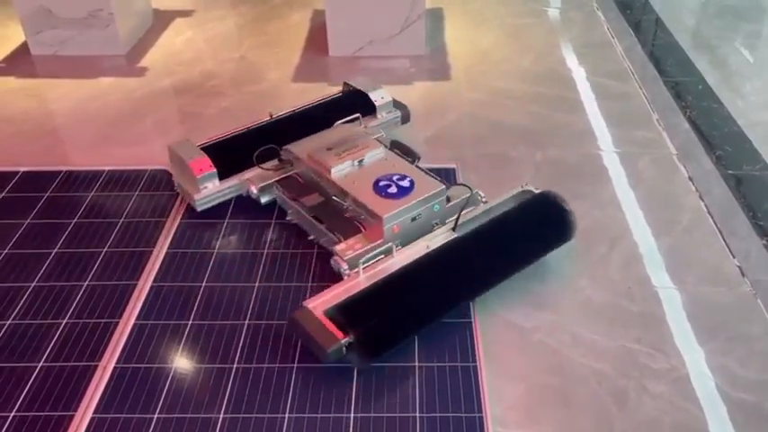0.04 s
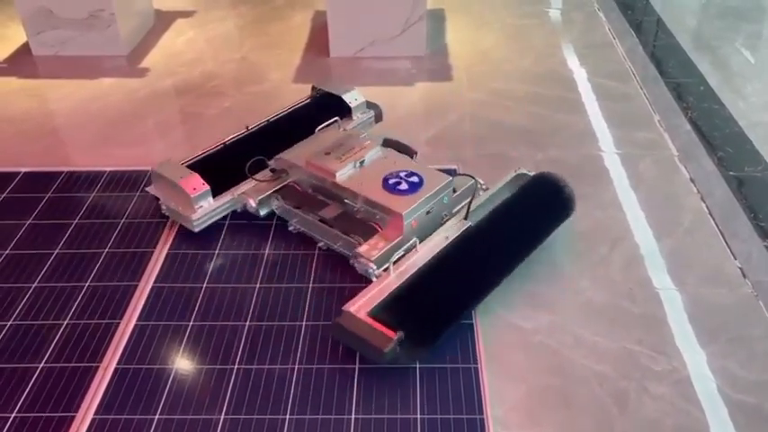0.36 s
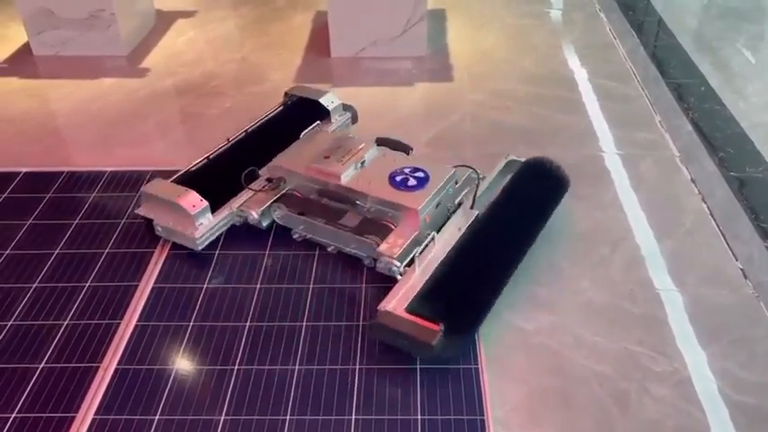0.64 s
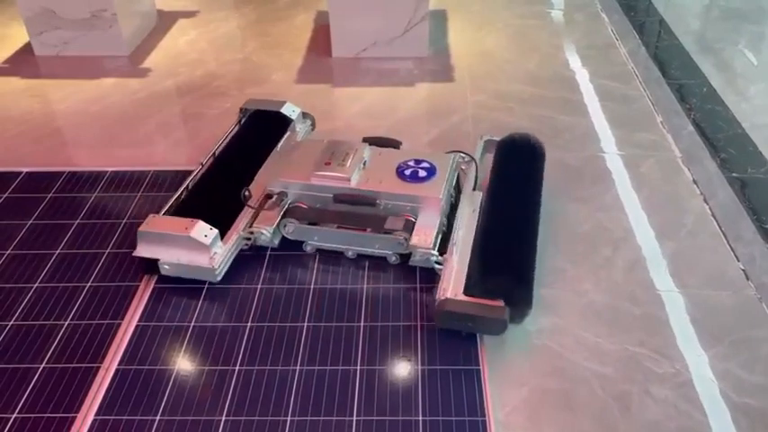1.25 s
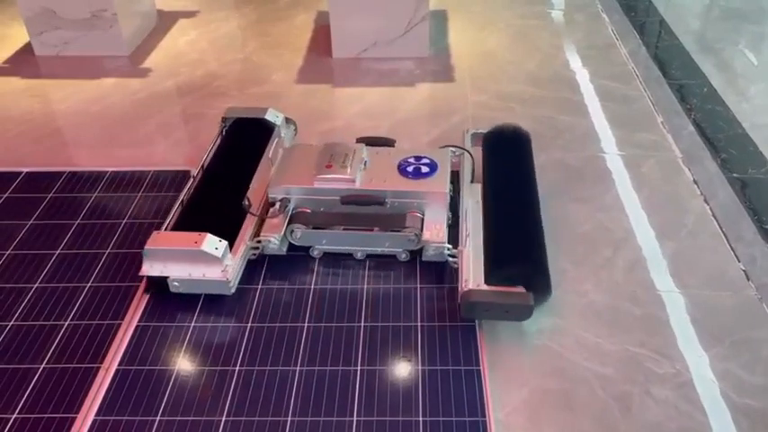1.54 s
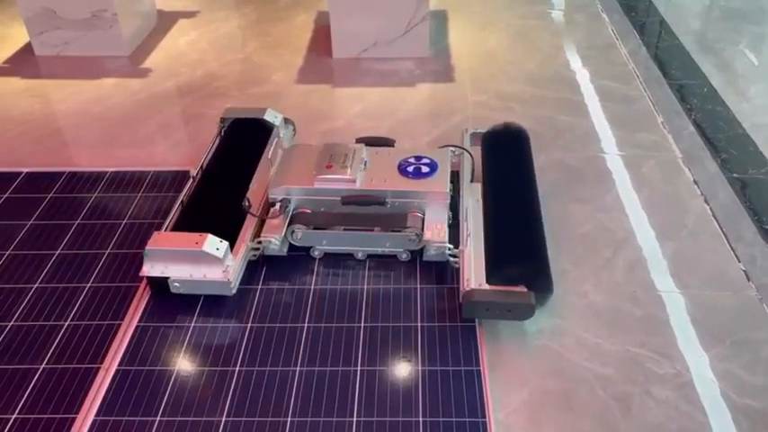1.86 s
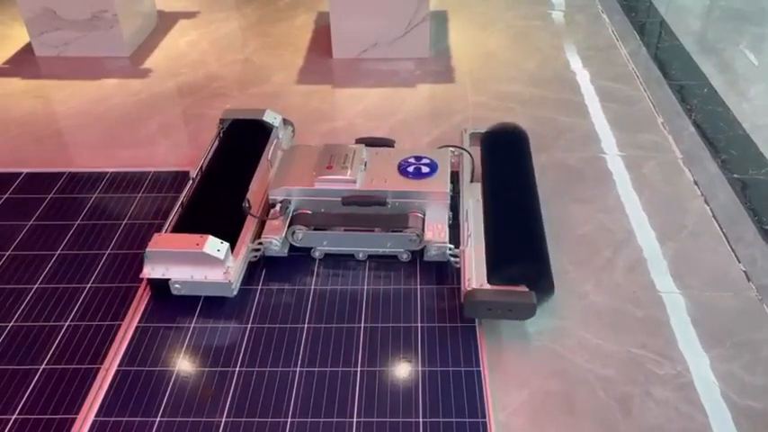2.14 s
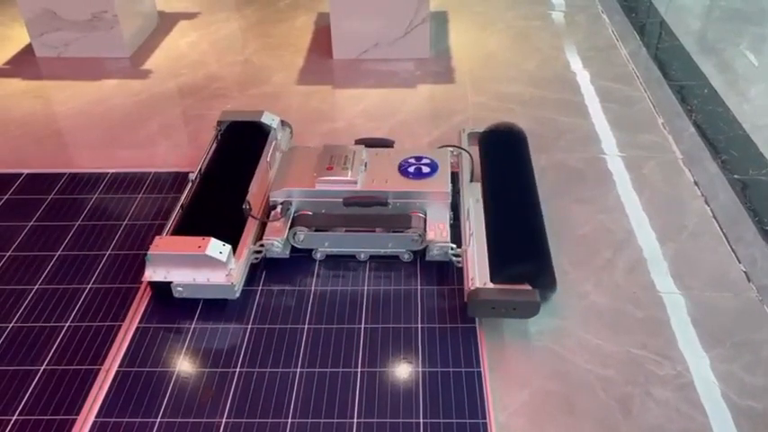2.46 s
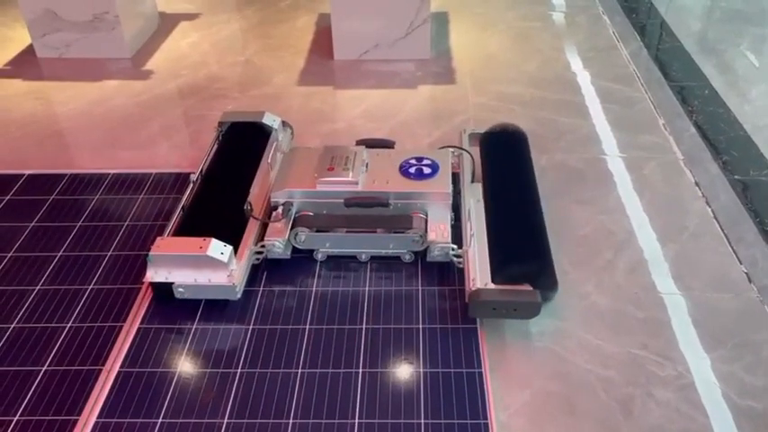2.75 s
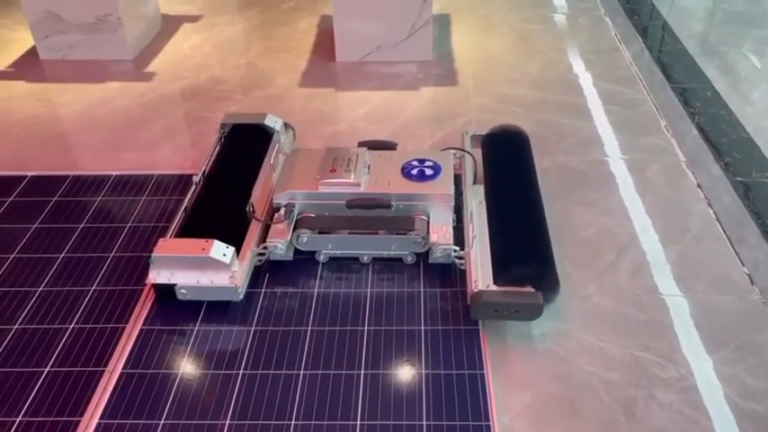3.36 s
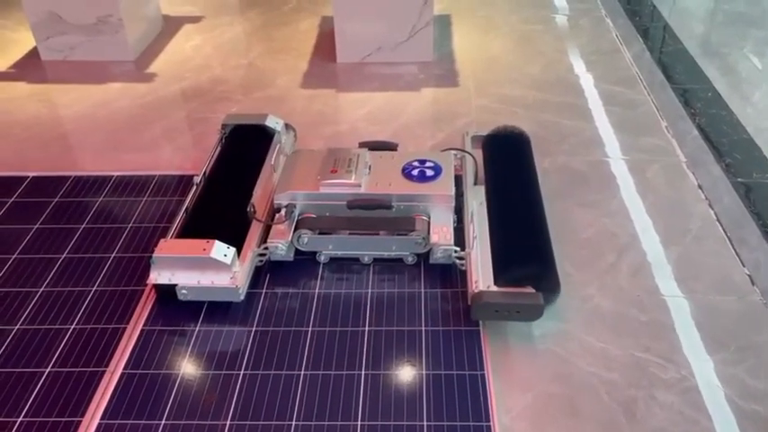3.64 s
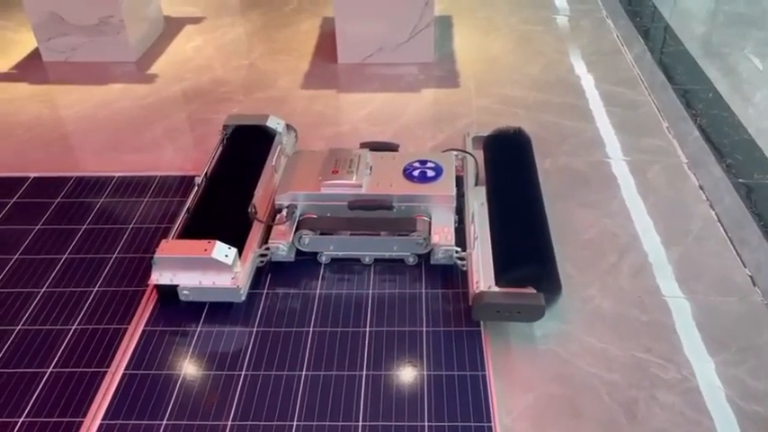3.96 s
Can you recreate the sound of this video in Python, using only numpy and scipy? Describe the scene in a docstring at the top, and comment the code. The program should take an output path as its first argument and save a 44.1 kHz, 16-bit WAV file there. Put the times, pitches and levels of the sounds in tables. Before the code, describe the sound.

A cleaning robot's rotating brushes hiss close by in a hard-floored hall, squeaking and rasping over a motor hum as it turns. The hiss steadies, a gear whine wavers, and a dull, booming thump comes near the end.

```python
"""A hard-floored hall, one microphone near a tracked cleaning robot on a glass panel.
First the robot turns: two roller brushes hiss through their housings and squeak as they are dragged
sideways, over the hum of the track drive. The turn ends in a rasp; the robot straightens up, the hiss
settles to a steady sweep, the drive comes to rest and a gear whine wavers as the load eases.
Near the end comes a dull, booming thump. The recorder's noise suppressor makes the hiss swirl."""
import sys
import numpy as np
from scipy import signal
from scipy.fft import rfft, irfft
from scipy.io import wavfile
from scipy.ndimage import uniform_filter1d, minimum_filter1d

SR = 44100
rng = np.random.default_rng(int(sys.argv[2]) if len(sys.argv) > 2 else 0)


def transcribe(signal):
    """Save signal, clipped to [-1, 1], as a 16-bit WAV file at the path in sys.argv[1]."""
    frames = np.atleast_2d(signal).T
    limited = np.clip(frames, -1, 1)
    pcm = np.round(limited * 32767).astype(np.int16)
    wavfile.write(sys.argv[1], SR, pcm)


N = 176400
TIME = np.arange(N) / SR
FREQS = np.maximum(np.arange(N // 2 + 1) * SR / N, 1)

# bristles scrubbing in the turn: time_s, level_db
SCRUB_LEVELS = [(0, -27.5), (.2, -28), (.5, -27.5), (.85, -29.5), (1.2, -35), (1.45, -41), (1.7, -50),
                (4, -52)]
# colour of the scrub: frequency_hz, relative_db
SCRUB_SPECTRUM = [(100, -36), (250, -13), (430, 0.5), (590, -7), (760, 1), (980, -2.5), (1200, 2.5),
                  (1800, 1), (2900, -2.5), (4000, 0), (4550, 0.5), (5400, 2), (6100, -4.5), (6800, -11.5),
                  (7300, -31), (8600, -21), (10500, -17), (12000, -20.5), (13600, -32)]
# panel and housing resonances (+) and dips (-) in the scrub: centre_hz, width_hz, gain_db
SCRUB_RESONANCES = [(1160, 54, 1.5), (1435, 70, 3.5), (1540, 53, -2), (1670, 79, 3), (2090, 90, 4.5),
                    (2260, 120, -4), (2428, 92, 7.5), (2870, 37, 3), (3235, 79, 7.5), (3500, 60, -1),
                    (3630, 68, 4), (4120, 280, 7.5), (4450, 150, -1.5), (5100, 110, 4.5)]
# steady sweep of the rollers: time_s, level_db
SWEEP_LEVELS = [(0, -35.5), (.6, -38), (1.1, -33), (1.4, -31.5), (1.65, -32), (2.05, -31), (2.35, -31.5),
                (2.9, -31.5), (3.3, -31.5), (3.7, -31), (4, -31.5)]
# colour of the sweep: frequency_hz, relative_db
SWEEP_SPECTRUM = [(100, -8), (400, -9.5), (600, -6), (800, -7), (980, -6.5), (1200, -3), (1450, 0),
                  (1900, -1), (3000, 1.5), (3900, 3), (4550, -0.5), (5200, -0.5), (6000, -6), (6800, -12.5),
                  (7300, -17.5), (8600, -20), (10500, -19.5), (12000, -25), (13600, -35)]
# panel and housing resonances and dips in the sweep: centre_hz, width_hz, gain_db
SWEEP_RESONANCES = [(843, 136, 5.5), (943, 89, -3), (1015, 18, 9), (1168, 111, 8), (1281, 120, 5),
                    (1506, 55, -6), (1593, 40, 3), (2117, 38.2, 4), (2200, 106, -4.5), (2558, 106, 4.5),
                    (3100, 110, -3), (3596, 47, 5), (5090, 220, 2.5)]
# rasp of the rollers as the turn ends: time_s, level_db
RASP_LEVELS = [(.6, -61), (.85, -44.5), (1.05, -39.5), (1.35, -41), (1.5, -46), (1.65, -65)]
# colour of the rasp: frequency_hz, relative_db
RASP_SPECTRUM = [(500, -38), (660, 6.5), (760, -17), (850, 6.5), (960, -25), (1300, -9), (1520, -24),
                 (1750, -4), (1960, 8.5), (2080, 0), (2220, -7), (2400, -33), (2560, 2), (2700, 0),
                 (3000, -27), (6000, -41)]
# brief bristle scrapes: centre_s, half_length_s, level_db
SCRAPE_SWELLS = [(0.228, 0.034, -31.5), (.85, .03, -42)]
# colour of the scrapes: frequency_hz, relative_db
SCRAPE_SPECTRUM = [(1000, -30), (2800, -14), (3400, -3), (3900, 6), (4300, -19), (4500, -20), (7000, -44)]
# roller squeaks: centre_s, half_length_s, pitch_hz, level_db
SQUEAKS = [(.17, .025, 4170, -32.5), (.295, .02, 4230, -33), (.46, .03, 4200, -33), (.525, .015, 4170, -33),
           (.675, .015, 4210, -31), (.85, .03, 4180, -35.5), (1.09, 0.018, 2560, -31.5),
           (1.225, 0.014, 2540, -30.5), (1.29, 0.01, 2590, -34), (1.39, .025, 2550, -37)]
# track drive: time_s, rotation_hz, level_db
DRIVE_MOTION = [(0, 49.03, -39.5), (.29, 49.87, -38), (.9, 49.83, -38), (1.48, 49.9, -37.5),
                (1.56, 50.2, -45.5), (1.62, 50.6, -45), (1.7, 50.6, -41), (1.83, 50.4, -42.5),
                (2.12, 49.8, -38), (2.26, 49.55, -39), (2.4, 49.3, -45.5), (2.62, 48.9, -62.5)]
# partials of the drive: multiple, relative_db
DRIVE_PARTIALS = [(3, -15), (4, -22), (5, -14.5), (6, 0), (7, -5.5), (8, -27), (9, -17)]
# thin whistle of the motor controller: time_s, level_db
WHISTLE_LEVELS = [(0, -62.5), (.68, -63.5), (.77, -69), (1.07, -61), (1.2, -69), (1.28, -60.5),
                  (1.43, -59.5), (1.48, -75), (1.85, -71), (2.06, -63), (2.35, -76)]
# gear whine, higher in the turn: time_s, pitch_hz, level_db
WHINE_CURVE = [(0, 1418, -54), (.16, 1425, -36.5), (.55, 1426, -51.5), (.75, 1422, -41), (1.02, 1390, -48),
               (1.4, 1310, -70), (1.58, 1247, -51), (1.84, 1245, -44), (1.93, 1253, -45),
               (2.14, 1259, -39.5), (2.28, 1284, -43), (2.38, 1238, -51), (2.48, 1284, -46),
               (2.6, 1272, -45), (2.76, 1260, -50), (2.9, 1268, -44), (3.02, 1220, -48),
               (3.12, 1243, -42.5), (3.3, 1258, -56), (3.43, 1303, -40), (3.64, 1242, -41),
               (3.75, 1299, -43), (3.86, 1240, -36.5), (4, 1269, -40.5)]
# brief surges of the whine: centre_s, half_length_s, level_db
WHINE_SURGES = [(1.59, 0.022, -38.5), (1.835, 0.02, -40), (2.668, .012, -39), (2.738, 0.02, -35.5),
                (2.81, 0.018, -35.5)]
# a soft nudge, then the blow: start_s, level_db
BLOWS = [(3.729, -37.5), (3.851, -18)]
# modes they set ringing, deepest first: pitch_hz, relative_db, t60_s
BLOW_MODES = [(88.6, -15, 0.86), (135.7, -8.5, 0.69), (159.2, -6, 0.51), (185, -13, 0.27),
              (198.5, -10, 0.54), (222, -5.5, 1), (267, -26, 0.18), (334.7, -7, 0.15), (380, -12, .1),
              (574, -25, 0.25)]
# colour of the contact tap: frequency_hz, relative_db
TAP_SPECTRUM = [(150, -12), (380, 0), (650, -9), (1100, -7), (2000, -24), (6000, -40)]
# diffuse boom in the hall: frequency_hz, relative_db
BOOM_SPECTRUM = [(40, -25), (90, -16), (150, 2.5), (250, -1), (400, -14), (700, -20.5), (1500, -34),
                 (4000, -59)]
# rumble of chassis and hall: frequency_hz, relative_db
RUMBLE_SPECTRUM = [(20, -32), (38, -23), (56, -3.5), (80, -7), (115, -4), (150, -4), (230, -1.5), (300, -6),
                   (420, -4), (700, -21), (2000, -76)]
# resonances and a dip in the rumble: centre_hz, width_hz, gain_db
RUMBLE_RESONANCES = [(95, 27, 2.5), (145, 12, 9), (170, 13, 1), (185.5, 15, -1.5), (208, 17, 8),
                     (240, 13, 5)]
# reach of the recorder's noise suppressor: frequency_hz, share_of_full_depth
SUPPRESSOR_REACH = [(400, 0), (700, .25), (1200, .1), (1500, .6), (1900, .6), (2250, 1), (3400, 1),
                    (4500, .8), (5000, .2), (6500, .25), (8500, 0)]


def brushes(flutter_db=.56):
    """Countless bristle contacts merge into a hiss: scrub and scrapes, a rasp, then a steady sweep."""
    scrub = from_db(in_time(SCRUB_LEVELS)[0]) * noise(SCRUB_SPECTRUM, SCRUB_RESONANCES)
    sweep = from_db(in_time(SWEEP_LEVELS)[0]) * noise(SWEEP_SPECTRUM, SWEEP_RESONANCES)
    rasp = from_db(in_time(RASP_LEVELS)[0]) * noise(RASP_SPECTRUM)
    scrapes = swells(SCRAPE_SWELLS) * noise(SCRAPE_SPECTRUM)
    return (scrub + sweep + rasp + scrapes) * from_db(flutter_db * drift(150 * 0 + 35))


def roller_squeaks(jitter=.011):
    """Rollers dragged sideways in the turn give short, unsteady friction squeaks."""
    out = np.zeros(N)
    for centre_s, half_length_s, hz, db in SQUEAKS:
        angle = running_phase(hz * (1 + jitter * drift(150)))
        out += swells([(centre_s, half_length_s, db)]) * np.sin(angle)
    return out


def track_drive(chassis_hz=347, chassis_width_hz=12, chassis_db=5.5, jitter=.002, shimmer_db=.5):
    """Two strong neighbouring partials beat into a purr, fullest on the chassis resonance."""
    rotation_hz, level_db = in_time(DRIVE_MOTION)
    scatter_rad = 1.5 * np.clip((TIME - 2.24) / .12, 0, 1)   # partials lose step as the tracks stop
    angle = running_phase(rotation_hz * (1 + jitter * drift(9.1)))
    hum = np.zeros(N)
    for multiple, partial_db in DRIVE_PARTIALS:
        lift_db = resonance_db(multiple * rotation_hz, chassis_hz, chassis_width_hz, chassis_db)
        gain = from_db(partial_db + lift_db + shimmer_db * drift(7.6))
        hum += gain * np.sin(multiple * angle + scatter_rad * drift(27))
    return np.sqrt(2) * from_db(level_db) * hum


def gear_whine(jitter=.005, shimmer_db=1.8):
    """A rough gear tone wavers and surges with the load on the rollers."""
    pitch_hz, level_db = in_time(WHINE_CURVE)
    angle = running_phase(pitch_hz * (1 + jitter * drift(47)))
    envelope = from_db(level_db + shimmer_db * drift(32)) + swells(WHINE_SURGES)
    return np.sqrt(2) * envelope * np.sin(angle)


def thumps(contact_s=.0016, spread_s=.0061, thud_hz=200, tap_t60_s=.02, boom_t60_s=1):
    """Each blow taps and thuds, rings low modes, the deepest last, and leaves a boom in the hall."""
    out = np.zeros(N)
    deepest_hz = BLOW_MODES[0][0]
    for start_s, db in BLOWS:
        for hz, mode_db, t60_s in BLOW_MODES:
            age = np.maximum(TIME - start_s - spread_s * deepest_hz / hz, 0)
            ring = from_db(db + mode_db - 60 * age / t60_s) * (1 - np.exp(-age / contact_s))
            out += ring * np.sin(2 * np.pi * (hz * age + rng.random()))
        age = np.maximum(TIME - start_s, 0)
        thud_pulse = np.exp(-((age - .0066) / .0042) ** 2)   # under two cycles long
        thud = from_db(db + 4) * thud_pulse * np.sin(2 * np.pi * thud_hz * age)
        tap = from_db(db - 10 - 60 * age / tap_t60_s) * (age > 0) * noise(TAP_SPECTRUM)
        boom_attack = np.minimum(age / .006, 1)
        boom = from_db(db - 6 - 60 * age / boom_t60_s) * boom_attack * noise(BOOM_SPECTRUM)
        out += thud + tap + boom
    return out


def rumble(level_db=-44.5, flutter_db=.6):
    """Chassis and hall resonate in a bed of low noise."""
    return from_db(level_db + flutter_db * drift(5.9)) * noise(RUMBLE_SPECTRUM, RUMBLE_RESONANCES)


def idle_hum(pitch_hz=54.1, level_db=-51, start_s=2.18, end_s=3.14, fade_s=.092):
    """A deep hum for about a second as the drive comes to rest."""
    gate = np.clip(np.minimum(TIME - start_s, end_s - TIME) / fade_s, 0, 1)
    return np.sqrt(2) * from_db(level_db) * gate * np.sin(2 * np.pi * pitch_hz * TIME)


def controller_whistle(switching_hz=9998):
    """The motor controller whistles faintly at its switching rate."""
    return np.sqrt(2) * from_db(in_time(WHISTLE_LEVELS)[0]) * np.sin(2 * np.pi * switching_hz * TIME)


def reflections(hiss, count=8, gain_db=-11, band_hz=(1400, 5000), delay_s=(.004, .013), wander_s=.00015):
    """Short paths off panel, floor and chassis shift as the robot moves and comb the hiss."""
    band = signal.sosfilt(signal.butter(2, band_hz, "band", fs=SR, output="sos"), hiss)
    paths = [np.interp(TIME - delay - wander_s * drift(1.5), TIME, band)
             for delay in rng.uniform(*delay_s, count)]
    return hiss + from_db(gain_db) * sum(paths) / np.sqrt(count)


def suppressor(x, threshold_db=-2.3, ratio=16, max_cut_db=32):
    """Narrow bands that fall below their surroundings are pushed further down, so the hiss swirls."""
    framing = dict(fs=SR, nperseg=1536, noverlap=1152)
    hz, _, cells = signal.stft(x, **framing)   # axis 0 is frequency, axis 1 is time
    power = uniform_filter1d(abs(cells) ** 2 + 1e-18, size=3, axis=0)
    local = uniform_filter1d(power, size=7, axis=1)
    surroundings = uniform_filter1d(uniform_filter1d(power, size=41, axis=1), size=7, axis=0)
    shortfall_db = threshold_db - 10 * np.log10(abs(local / surroundings) + 1e-9)
    reach = np.interp(hz, *np.transpose(SUPPRESSOR_REACH))[:, None]
    cut_db = np.clip(ratio * shortfall_db, 0, max_cut_db) * reach
    gain = minimum_filter1d(from_db(-cut_db), size=3, axis=0)
    return signal.istft(cells * gain, **framing)[1][:N]


def noise(spectrum, resonances=()):
    """Unit-power noise with a broad colour and narrow resonances."""
    hz, db = np.transpose(spectrum)
    shape_db = np.interp(np.log(FREQS), np.log(hz), db)
    shape_db += sum(resonance_db(FREQS, *row) for row in resonances)
    return unit_power(irfft(rfft(rng.standard_normal(N)) * from_db(shape_db), N))


def resonance_db(hz, centre_hz, width_hz, gain_db):
    """Bell-shaped lift or dip around a centre frequency."""
    return gain_db / (1 + (2 * (hz - centre_hz) / width_hz) ** 2)


def drift(rate_hz):
    """Random wandering with spread 1, rolling off above the given rate."""
    spectrum = rfft(rng.standard_normal(N)) / (1 + (FREQS / rate_hz) ** 2)
    return unit_power(irfft(spectrum * (FREQS > 1), N))


def swells(rows):
    """Envelope of brief rounded swells."""
    return sum(from_db(db) * np.exp(-((TIME - centre_s) / half_length_s) ** 2)
               for centre_s, half_length_s, db in rows)


def running_phase(hz):
    """Angle in radians at a changing rate, from a random start."""
    return 2 * np.pi * (np.cumsum(hz) / SR + rng.random())


def in_time(rows):
    """Each column of a control curve at every sample."""
    time_s, *columns = np.transpose(rows)
    return [np.interp(TIME, time_s, column) for column in columns]


def from_db(db):
    """Decibels to gain."""
    return 10 ** (np.asarray(db) / 20)


def unit_power(x):
    """Scale to a mean square of 1."""
    return x / np.sqrt(np.mean(x ** 2) + 1e-20)


def scene():
    """Robot and hall as they reach the one microphone."""
    foreground = reflections(brushes()) + roller_squeaks() + track_drive() + gear_whine()
    background = rumble() + idle_hum() + controller_whistle()
    return (foreground + thumps() + background)[None]


def record(dry, notch_hz=7770, notch_width_hz=800, cutoff_hz=13750):
    """The recorder suppresses noise, has a narrow dead band in the treble and a steep top cut."""
    notch = 1 / (1 + (notch_width_hz / 2 / (abs(FREQS - notch_hz) + 1)) ** 16)
    top_cut = 1 / (1 + (FREQS / cutoff_hz) ** 250)
    return irfft(rfft(suppressor(dry[0])) * notch * top_cut, N)[None]


dry = scene()
out = record(dry)
transcribe(out)
```